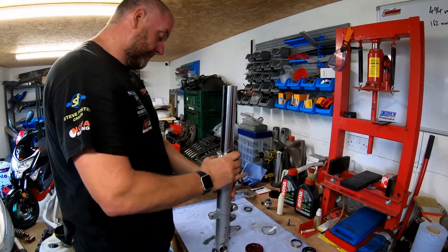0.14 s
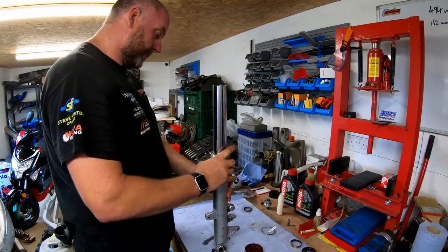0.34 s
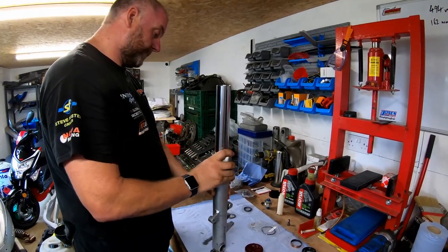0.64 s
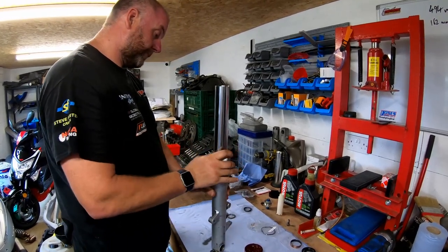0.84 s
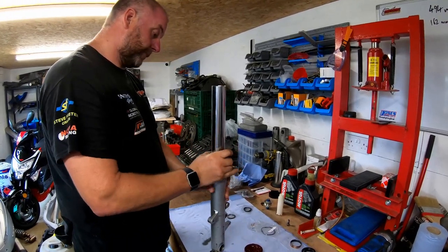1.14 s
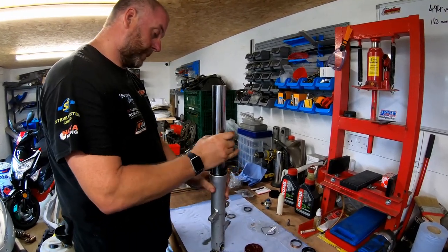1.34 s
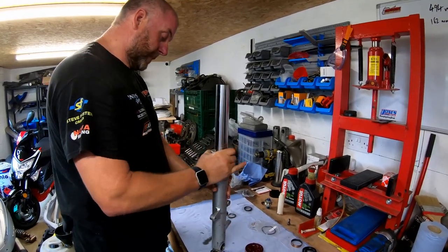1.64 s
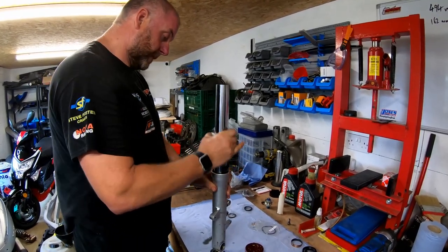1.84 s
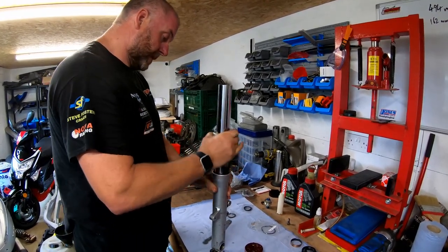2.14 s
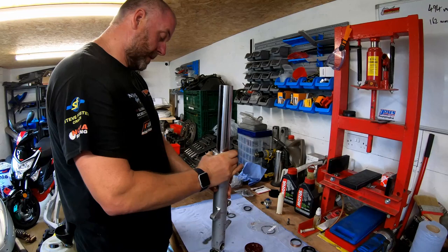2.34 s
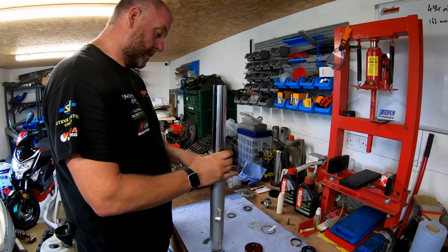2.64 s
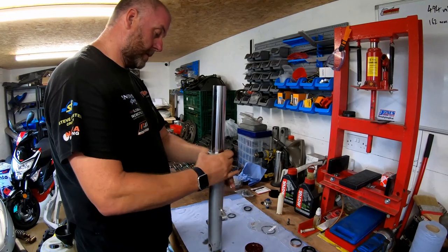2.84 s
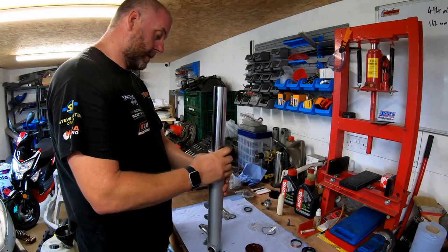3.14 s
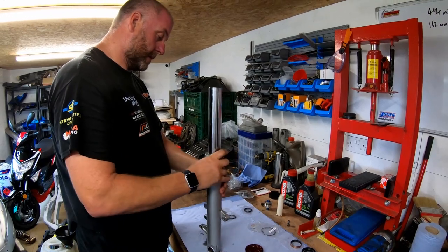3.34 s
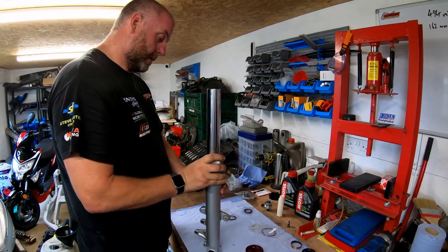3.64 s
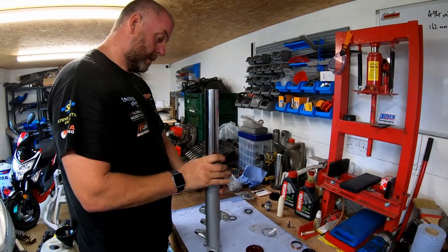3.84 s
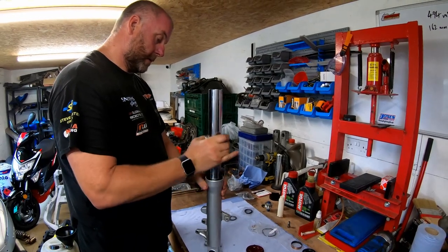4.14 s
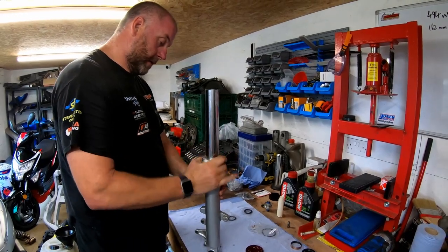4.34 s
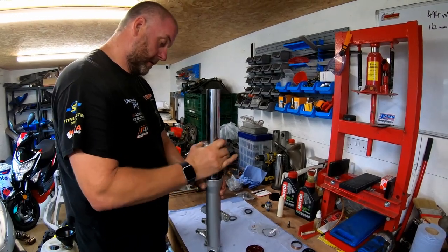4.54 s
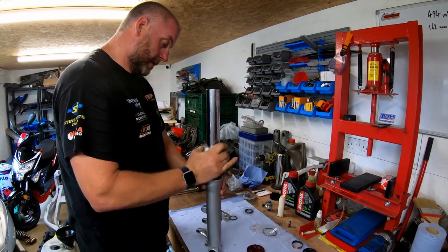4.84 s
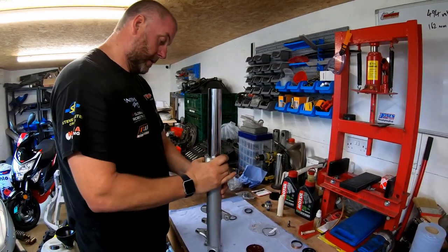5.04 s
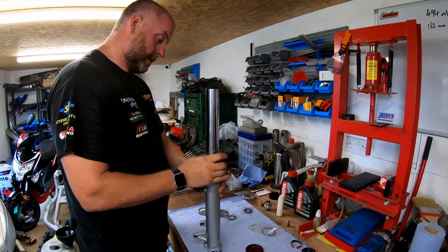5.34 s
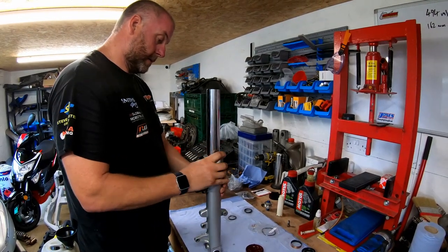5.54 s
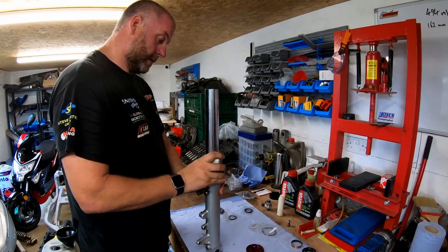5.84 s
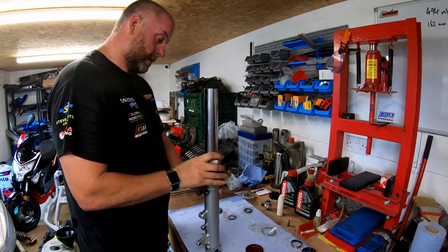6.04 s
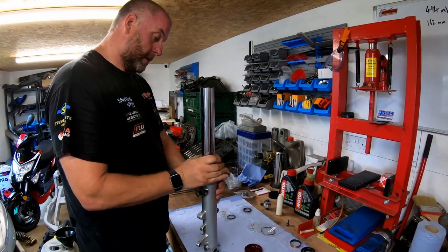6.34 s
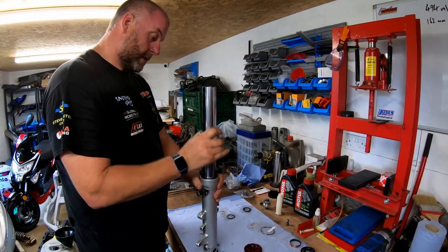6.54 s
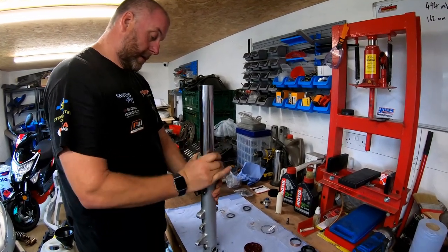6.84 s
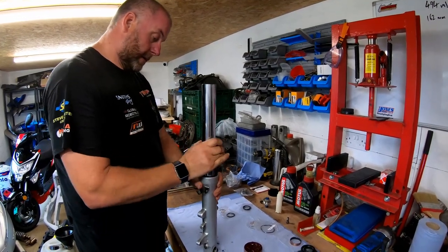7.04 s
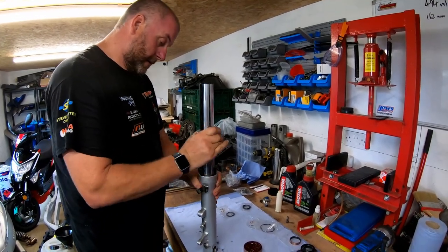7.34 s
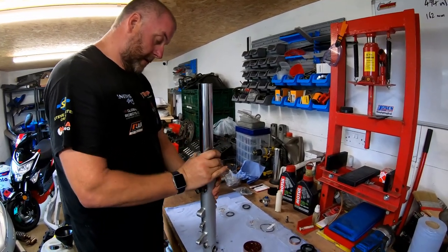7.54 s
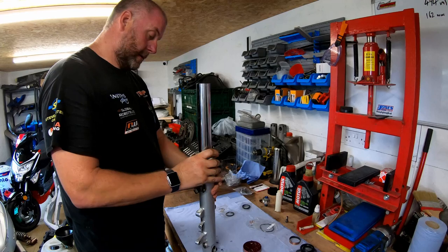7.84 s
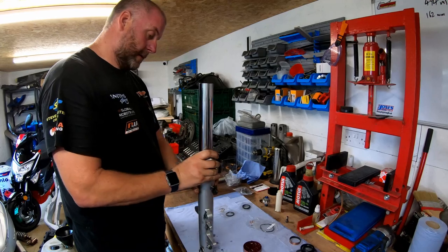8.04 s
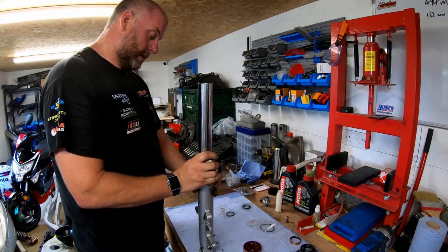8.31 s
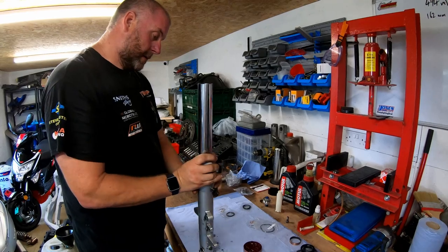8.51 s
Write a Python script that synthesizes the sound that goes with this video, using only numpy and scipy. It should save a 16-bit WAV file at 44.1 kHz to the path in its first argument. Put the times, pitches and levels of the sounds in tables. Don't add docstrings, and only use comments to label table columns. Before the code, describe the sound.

Close stereo in a small, quietly humming workshop. A steel driver slides along a fork tube and knocks a seal home: one hard knock, a pause with soft rubbing, three quick knocks, a light tap, three more, then two heavy blows. Each is a short metallic crack over a woody bench thump, with a thin ring of the tube soon choked by a hand. Loose driver halves clink between.

```python
import sys
import numpy as np
from scipy import signal
from scipy.fft import rfft, irfft
from scipy.io import wavfile

SR = 44100
rng = np.random.default_rng(int(sys.argv[2]) if len(sys.argv) > 2 else 0)


def gain_from_db(level_db):
    decades = np.asarray(level_db, float) / 20
    return 10 ** decades


def master(y):
    cut = np.clip(np.atleast_2d(y).T, -1, 1)
    pcm = np.round(cut * 32767)
    wavfile.write(sys.argv[1], SR, pcm.astype(np.int16))


N = 382655
RUN_IN = 4410
LONG = N + RUN_IN

# start_s, crack_db, bench_thump_db, slider_clack_db
KNOCKS = [
    (0.2416, -18, -11.5, -17),
    (1.811, -15, -10.5, -18),
    (2.119, -16.5, -11, -16.5),
    (2.4138, -16, -11.5, -17.5),
    (3.3712, -20, -16, -24),
    (4.5467, -13, -9, -16),
    (4.8337, -15, -11.5, -16.5),
    (5.117, -15.5, -11, -17),
    (7.0259, -13.5, -8, -17),
    (7.614, -15.5, -10, -15.5),
]
# start_s, crack_db, bench_thump_db, slider_clack_db
EARLIER = [(-.06, -12.5, -7.5, -14.5)]
# start_s, crack_db, bench_thump_db, collar_clack_db
LIFTS = [
    (0.1671, -51, -26.5, -31.5),
    (1.1609, -70, -60.5, -54.5),
    (1.7392, -59, -63.5, -53.5),
    (2.0323, -45.5, -27, -32.5),
    (2.3342, -46.5, -31, -31.5),
    (4.7630, -46, -23, -27.5),
    (5.061, -38.5, -24, -25.5),
    (7.528, -31, -19, -21),
]
# freq_hz, level_db (per Hz)
CRACK = [(880, -33.5), (1500, 0), (2260, 2.5), (2600, -7.5), (3120, -3.5), (4170, -9.5), (7970, -6.5),
         (10500, -20), (11500, -23.5), (14900, -51.5), (22000, -120)]


def at_hz(points, hz):
    table_hz, value = np.transpose(points)
    return np.interp(np.log(np.maximum(hz, 1)), np.log(table_hz), value)


def rms_one(x):
    return x / np.sqrt(np.mean(x ** 2) + 1e-20)


def colour(x, points):
    cepstrum = irfft(at_hz(points, np.fft.rfftfreq(4096, 1 / SR)) * np.log(10) / 20)
    cepstrum[1:2048] *= 2
    cepstrum[2049:] = 0
    taps = irfft(np.exp(rfft(cepstrum)))
    taps = taps.reshape((1,) * (x.ndim - 1) + (-1,))
    return signal.oaconvolve(x, taps, axes=-1)[..., :x.shape[-1]]


def low_pass(x, hz):
    return signal.lfilter(*signal.butter(2, hz, fs=SR), x)


def clicks(times, db):
    out = np.full(LONG, 1e-18)
    np.add.at(out, np.round(times * SR).astype(int) + RUN_IN, gain_from_db(db))
    return out


def struck(modes, times, db, scatter_db):
    out = 0
    luck = rng.standard_normal((len(times), len(modes)))
    for k, (hz, level_db, t60) in enumerate(modes):
        r = gain_from_db(-60 / (t60 * SR))
        w = 2 * np.pi * hz / SR
        blows = clicks(times, db + level_db + scatter_db * luck[:, k])
        out = out + (-1) ** k * signal.lfilter([0, np.sin(w)], [1, -2 * r * np.cos(w), r * r], blows)
    return out


def single_rings(rows):
    return sum(struck([(hz, db, t60)], np.array([s]), 0, scatter_db=1.0) for s, hz, db, t60 in rows)


def chatter(times, db, length_s, spectrum):
    t = np.arange(SR // 10) / SR
    shape = np.minimum(t / 0.00041, 1) * np.exp(-(t / length_s) ** 2)
    blows = clicks(times, db)
    noise = colour(rng.standard_normal(LONG), spectrum)
    burst = signal.oaconvolve(blows, shape)[:LONG] * rms_one(noise)
    return burst, colour(blows, spectrum) / noise.std()


def sung(noise, peaks):
    out = 0
    for hz, width_hz, db in peaks:
        r = np.exp(-np.pi * width_hz / SR)
        feedback = [1, -2 * r * np.cos(2 * np.pi * hz / SR), r * r]
        out = out + gain_from_db(db) * rms_one(signal.lfilter([1, 0, -1], feedback, noise))
    return out


def wide_noise(length):
    # freq_hz, correlation (0 to 1)
    likeness = [(60, 0.96), (170, 0.97), (350, 0.91), (520, 0.75), (1370, 0.27), (3890, 0.17),
                (11000, 0.023)]
    alike = np.clip(at_hz(likeness, np.fft.rfftfreq(length, 1 / SR)), -.99, .99)
    shares = np.sqrt([(1 + alike) / 2, (1 - alike) / 2])
    mid, side = rfft(rng.standard_normal((2, length))) * shares
    return irfft(np.array([mid + side, mid - side]), length)


def flicker(rate_hz, db):
    r = np.exp(-2 * np.pi * rate_hz / SR)
    wander = signal.lfilter([1], [1, -2 * r, r * r], rng.standard_normal(2 * N))[N:]
    return gain_from_db(db * rms_one(wander))


def strokes(rows):
    swing_db = 20
    out = np.zeros(N)
    for s, swell, fade, db in rows:
        i = np.arange(max(int((s - 2 * swell) * SR), 0), min(int((s + 2 * fade) * SR), N))
        t = i / SR - s
        out[i] += gain_from_db(db - swing_db * np.maximum(-t / swell, t / fade))
    return out


def background():
    # start_s, drone_db
    traffic = [(0, -49.5), (.7, -52.5), (.95, -52), (1.1, -72), (1.18, -41), (1.32, -55.5), (2.8, -53.5),
               (3.15, -55), (3.3, -65.5), (3.8, -67.5), (4.15, -59.5), (4.4, -78.5), (5.5, -50.5),
               (5.8, -58), (6.4, -48.5), (6.8, -56.5), (7.4, -51.5), (8.68, -63.5)]
    # start_s, deep_roll_db
    heavy = [(0, -71.5), (1.2, -53), (1.8, -55), (2.8, -70.5), (3.6, -70), (4.2, -57), (5.4, -75),
             (6.2, -81), (6.9, -54.5), (7.5, -56.5), (8.68, -83.5)]
    # freq_hz, width_hz, level_db
    drone_peaks = [(82.4, 2.9, 3), (104, 7.3, -27.5)]
    # freq_hz, width_hz, level_db
    hum = [(202.4, 5.3, -67), (356, 1.3, -76), (748, 160, -77.5)]
    # peak_s, swell_s, fade_s, level_db
    whine = [(3.0, .3, 0.28, -69.5)]
    # freq_hz, level_db (per Hz)
    air_spectrum = [(12, -44.5), (20, -10), (64, 1.5), (93, 2), (139, -11.5), (207, -10), (350, -21),
                    (499, -27), (743, -17), (2730, -27.5), (8130, -56.5), (11500, -61), (14900, -101),
                    (22000, -120)]
    t = np.arange(N) / SR
    drone, roll = [gain_from_db(np.interp(t, *np.transpose(rows))) for rows in (traffic, heavy)]
    noise = wide_noise(N)
    low = drone * sung(noise, drone_peaks)
    low = low + roll * sung(noise, [(54.5, 4.5, 1.3)])
    low = low + sung(noise, hum)
    low = low + strokes(whine) * sung(noise, [(956, 11, 0)])
    air = rms_one(colour(wide_noise(N), air_spectrum))
    return low + gain_from_db(-57.5) * flicker(3.6, db=0.5) * air


def bench_thump():
    # freq_hz, level_db, t60_s
    boom = [(57.7, -27, 0.79), (69.66, -16.5, 0.73), (80.97, -15.5, 0.58), (105, -14, 0.42),
            (114.6, -17.5, 0.49), (133.3, -10, 0.29), (142.2, -13.5, 0.41), (169.7, -13, 0.3),
            (197.01, -16.5, 0.38), (211.6, -13, 0.31), (234, -21, 0.12), (252.9, -27.5, 0.25),
            (296.8, -17, 0.35), (334, -20, 0.15), (391.3, -17, 0.15), (428.4, -19.5, 0.18)]
    # freq_hz, level_db, t60_s
    bench_top = [(92, -2, 0.044), (250, 1.5, 0.014), (430, -18, 0.027), (591, -17, 0.04), (707, -13, 0.03)]
    # delay_s after the knock, level_db
    bounces = [
        (.0008, 5),
        (.0050, -0.5),
        (.0092, -5),
    ]
    # start_s, frame_db, top_db
    bumps = [
        (1.169, -47, -52),
        (4.037, -42, -41.5),
        (6.357, -49.5, -41.5),
        (6.919, -33, -30.5),
        (8.13, -52, -40.5),
    ]
    s, _, thump_db, _ = np.transpose(EARLIER + KNOCKS + LIFTS)
    thump = struck(boom, s + 0.0065, thump_db + 4.5, scatter_db=2.4)
    thump += struck([(114.7, -1, 0.048)], s + .0075, thump_db, scatter_db=6.5)
    for wait_s, db in bounces:
        thump -= struck(bench_top, s + wait_s, thump_db + db + 4.5, scatter_db=1.6)
    bump_s, frame_db, top_db = np.transpose(bumps)
    thump += low_pass(struck(boom, bump_s, frame_db - 5.5, scatter_db=7.0), 130)
    thump += struck([(188, 0, 0.076), (240, -2, 0.026)], bump_s + .004, top_db, scatter_db=3.5)
    lift_s, _, lift_db, _ = np.transpose(LIFTS)
    thump += struck([(85, -1.5, 0.11)], lift_s + 0.0071, lift_db, scatter_db=13.5)
    push = low_pass(clicks(s, thump_db - 12.0), 600)
    return low_pass(thump, 650), push


def knocks():
    # freq_hz, level_db, t60_s
    body = [(1270, -3.5, 0.028), (2130, -7, 0.018), (2600, -7.5, 0.011), (2990, -6.5, 0.031),
            (4500, 0.5, 0.008), (6340, -8, .015), (8000, -7, 0.0062)]
    # freq_hz, level_db (per Hz)
    slider = [(260, -25), (420, 1), (540, -5), (720, -2.5), (1050, -7.5), (1290, -5.5), (1520, -11.5),
              (2000, -15.5), (2600, -18.5), (4000, -53), (8800, -100)]
    blow_s, blow_db, *_ = np.transpose(EARLIER + KNOCKS + LIFTS)
    crack, crack_click = chatter(blow_s, blow_db - 2.0, 0.0094, CRACK)
    s, crack_db, _, clack_db = np.transpose(EARLIER + KNOCKS)
    high = [mode for mode in body if mode[0] > 3000]
    low = [mode for mode in body if mode[0] < 3000]
    crack += struck(high, s + .001, crack_db - 8.5, scatter_db=8.0)
    crack += struck(low, s + .009, clack_db - 0.5, scatter_db=1.0)
    clack, clack_click = chatter(s, clack_db + 1.5, 0.022, slider)
    return crack + clack, crack_click + gain_from_db(3.0) * clack_click


def lifts():
    # freq_hz, level_db (per Hz)
    collar = [(260, -33.5), (450, -6.5), (643, -4), (757, -5.5), (1160, -6), (1330, -13.5), (1940, -8.5),
              (2390, -21), (3060, -21), (3610, -36), (6000, -30.5), (7800, -63), (13200, -120)]
    # freq_hz, level_db, t60_s
    collar_ring = [(640, -0.5, .08), (983, 1.5, 0.049), (1100, -1, 0.04), (1196, -1, .08),
                   (1954, -11.5, .07), (2060, -11.5, 0.08), (3050, -17.5, .05), (4600, -26.5, .03)]
    s, _, _, clack_db = np.transpose(LIFTS)
    rattle, click = chatter(s, clack_db + 4.5, 0.024, collar)
    rattle += struck(collar_ring, s, clack_db + 2.0, scatter_db=2)
    return rattle, gain_from_db(2.5) * click


def tube():
    # start_s, freq_hz, level_db, t60_s, gripped_s
    rings = [(-.06, 6700, -53, 0.94, .2), (-.06, 2718, -54.5, 1.0, .2), (0.241, 2710, -51, 1.2, .9),
             (.411, 2718, -72, 0.72, .95), (2.415, 2718, -52.5, 0.77, 3.3), (3.374, 2724, -58, 2.9, 4.15),
             (4.548, 2746, -51.5, 1.52, 4.85), (4.833, 2740, -50, 1.6, 5.3), (5.117, 2730, -55, 0.96, 5.6),
             (7.025, 2731, -48, 1.3, 7.38), (7.026, 3590, -61, 1.6, 7.4), (7.529, 2780, -42.5, 0.315, 9.9),
             (7.615, 2718, -45, 2.05, 8.25), (7.615, 3640, -62.5, 1.3, 8.1), (7.615, 6640, -65, 1.2, 8.0)]
    t = (np.arange(LONG) - RUN_IN) / SR
    return sum(single_rings([row[:4]]) * gain_from_db(-70 * np.maximum(t - row[4], 0)) for row in rings)


def workshop(x):
    # freq_hz, t60_s
    room_t60 = [(100, 0.77), (350, 0.39), (1000, 0.38), (2500, 0.39), (6400, 0.37), (11000, 0.34)]
    # freq_hz, level_db
    room_level = [(100, -15.5), (400, 3), (1200, 5), (3000, 2), (6000, 1.5), (8500, 2), (11000, 1.5)]
    t = np.arange(SR) / SR
    noise = wide_noise(SR)
    echo = 0
    edges = 60 * 2 ** np.arange(0, 8.1, .5)
    for low, high in zip(edges, edges[1:]):
        band = signal.sosfilt(signal.butter(2, [low, high], "band", fs=SR, output="sos"), noise)
        hz = np.sqrt(low * high)
        echo = echo + band * gain_from_db(at_hz(room_level, hz) - 60 * t / at_hz(room_t60, hz))
    build_up = np.clip((t - .003) / 0.0064, 0, 1)
    return signal.oaconvolve(x[None], echo * build_up, axes=-1)[:, :LONG]


def rubbing():
    # peak_s, swell_s, fade_s, skin_hiss_db, singing_steel_db
    along_tube = np.array([(.82, 0.055, 0.2, -77, -77), (1.27, 0.067, 0.088, -77, -75),
                           (1.5, 0.33, 0.2, -70.5, -67.5), (1.7, 0.18, 0.15, -80, -74),
                           (3.0, .3, 0.27, -88.5, -79.5), (3.27, 0.22, 0.058, -84, -69),
                           (3.8, 0.24, 0.066, -73.5, -76.5), (3.87, .06, 0.056, -72, -78),
                           (4.17, 0.027, 0.11, -86, -76.5), (4.335, 0.12, 0.13, -64, -59.5),
                           (5.94, 0.019, .03, -85, -84), (6.065, 0.112, 0.12, -65, -73),
                           (6.38, 0.26, 0.179, -90.5, -69.5), (6.6, 0.088, .2, -78.5, -60.5),
                           (6.78, 0.22, 0.13, -63.5, -52.5), (7.3, 0.2, 0.26, -84, -65),
                           (7.47, .1, 0.21, -76, -76), (7.525, 0.013, .005, -57.5, -60),
                           (8.2, 0.071, 0.13, -63.5, -66.5), (8.55, 0.154, 0.16, -84.5, -71.5),
                           (8.67, .2, .1, -81.5, -62)])
    # peak_s, swell_s, fade_s, level_db
    scuffs = [(.69, 0.18, 0.33, -72), (1.18, 0.4, 0.16, -59.5), (1.66, 0.24, 0.3, -62.5),
              (2.96, 0.43, 0.4, -65), (3.32, 0.17, 0.11, -77), (4.05, 0.34, 0.18, -61),
              (4.33, 0.405, 0.33, -55.5), (5.59, 0.08, 0.103, -59.5), (6.39, 0.18, 0.112, -55.5),
              (6.53, 0.086, 0.78, -57.5), (6.88, 0.094, 0.13, -56.5), (7.25, .2, 0.22, -58.5),
              (8.14, 0.046, 0.28, -61.5), (8.62, 0.412, 0.28, -59)]
    # freq_hz, level_db (per Hz)
    skin_spectrum = [(880, -28.5), (1500, 1.5), (3830, -3.5), (5200, -8.5), (6170, -6), (11500, -14),
                     (14900, -49.5), (22000, -120)]
    # freq_hz, width_hz, level_db
    steel_peaks = [(1700, 150, -5), (2400, 600, -5), (3400, 170, 0), (4400, 100, -5), (5900, 300, -12),
                   (8200, 150, -11)]
    # freq_hz, width_hz, level_db
    sleeve_peaks = [(240, 180, 0), (380, 290, -5.5), (834, 400, 0), (1270, 230, -9)]
    # freq_hz, width_hz, level_db
    lean_peaks = [(190, 110, 1), (328, 140, -6.5)]
    # high hiss, singing bands, low bands [dB]
    rush_db = [-39.5, -43.5, -19.5]
    rush_s = [0.06, .07, 0.02]
    skin, steel, lean = [strokes([(s - .003, swell, .004, crack_db + db) for s, crack_db, *_ in KNOCKS])
                         for db, swell in zip(rush_db, rush_s)]
    skin = skin + strokes(along_tube[:, [0, 1, 2, 3]])
    steel = steel + strokes(along_tube[:, [0, 1, 2, 4]])
    noise = wide_noise(N)
    hiss = gain_from_db(7.5) * rms_one(colour(noise, skin_spectrum)) * skin
    song = gain_from_db(-1.5) * rms_one(sung(noise[:, ::-1], steel_peaks)) * steel
    scuff = gain_from_db(-2.5) * rms_one(sung(noise, sleeve_peaks)) * strokes(scuffs)
    return flicker(60, db=1.5) * (hiss + song + scuff) + lean * sung(noise, lean_peaks)


def touched(modes, s, db, ratio, luck):
    t = np.arange(SR // 4) / SR
    hz, level_db, t60 = np.transpose(modes)[:, :, None]
    hz = hz * np.clip(ratio, .96, 1.04) * (1 + .005 * luck[0][:, None])
    decay = gain_from_db(db + level_db + 2 * luck[1][:, None] - 60 * t / t60)
    ring = np.sum(decay * np.sin(2 * np.pi * hz * t), axis=0)
    out = np.zeros(LONG + SR)
    i = int(s * SR) + RUN_IN
    out[i:i + len(t)] = ring * (1 - np.exp(-(t / .0007) ** 2))
    return out[:LONG]


def clinks():
    # start_s, low_group_db, high_group_db, high_group_pitch_ratio (as the grip seats it
    touches = [(0.4109, -39, -46.5, 1.0), (1.1590, -42, -73, 0.76), (1.169, -51.5, -57.5, 1.005),
               (1.218, -54, -66.5, 1.0), (1.243, -58, -71, 1.0), (1.737, -54, -67, 1.0),
               (3.334, -40, -52.5, 1.0), (4.435, -28, -39.5, 1.032), (4.4482, -34, -42, 1.015),
               (4.459, -41, -55, .99), (4.484, -43, -47.5, 1.025), (5.061, -22.5, -40, 0.92),
               (5.4083, -47.5, -52, .99), (5.6155, -39, -43.5, .965), (5.626, -48, -46, 1.1),
               (6.9098, -14, -22.5, 1.012), (6.918, -26.5, -19.5, 1.014), (6.944, -34.5, -32, 1.02),
               (6.962, -43, -39, 1.1), (6.988, -40, -40, 1.02), (7.5287, -21, -39, .975),
               (7.543, -24.5, -38, 1.1), (7.556, -20.5, -46, .97)]
    # freq_hz, level_db, t60_s
    halves_low = [(1260, -20.5, 0.023), (1810, -6.5, 0.037), (1910, -1, 0.068), (2006, 0, 0.045),
                  (2160, -6, 0.04), (2753, -13.5, 0.04), (3100, -10.5, 0.035), (3430, -11.5, 0.03),
                  (3850, -8, 0.044)]
    # freq_hz, level_db, t60_s
    halves_high = [(4380, -12, .03), (5140, -14.5, 0.034), (5320, -14, 0.056), (5560, -9, 0.061),
                   (5580, -5, 0.095), (5797, -2.5, 0.067), (5780, -6.5, .05), (5900, -13.5, 0.045),
                   (6670, -22, 0.04)]
    rebound_s, rebound_db = 0.0033, -5.5
    start_s, all_low_db, *_ = np.transpose(touches)
    broad_tick = sum(chatter(start_s, all_low_db - 18, 0.02, CRACK))
    luck = rng.standard_normal((len(touches), 2, 2, len(halves_low)))
    rings = 0
    for (s, low_db, high_db, ratio), (low_luck, high_luck) in zip(touches, luck):
        rings = rings + touched(halves_low, s, low_db, 1, low_luck)
        rings = rings + touched(halves_high, s, high_db + 4, ratio, high_luck)
    return broad_tick + rings + gain_from_db(rebound_db) * np.roll(rings, int(rebound_s * SR))


def ticks():
    # start_s, freq_hz, level_db, t60_s
    contacts = [(1.161, 2900, -44, 0.09), (1.161, 3600, -60, 0.028), (1.177, 660, -44.5, 0.06),
                (.862, 3800, -59, 0.025), (6.5, 1800, -51.5, 0.037), (5.617, 3300, -51.5, 0.05),
                (5.617, 4680, -51, .06), (6.1, 2720, -51.5, 0.091), (5.618, 1260, -53.5, .06),
                (4.436, 1700, -42, .04), (6.912, 3350, -30.5, .04), (6.912, 3000, -28, .07),
                (5.62, 2000, -52, 0.053), (5.63, 1400, -50, 0.046), (1.159, 1800, -45, 0.116),
                (6.915, 5000, -30, .03), (7.53, 1700, -34.5, .04), (1.6, 2700, -45.5, 0.053),
                (3.334, 2880, -45.5, 0.03), (3.334, 1200, -49, 0.034), (4.167, 2500, -53, 0.018),
                (4.233, 1630, -38.5, 0.021), (2.1, 2100, -47.5, 0.043), (8.184, 2520, -48, 0.12),
                (8.19, 2900, -53, 0.11), (8.185, 1540, -60, 0.04), (8.184, 2000, -58.5, .04),
                (8.547, 3900, -56, 0.025)]
    return single_rings(contacts)


def scene():
    # freq_hz, level_db
    steel_shadow = [(250, -7.5), (400, 1), (650, -9.5), (1500, -15), (3000, -1), (8000, -4.5), (11000, 6.5)]
    # freq_hz, level_db
    bench_shadow = [(250, -0.55), (420, 1), (600, -6)]
    thump, push = bench_thump()
    knock, knock_click = knocks()
    lift, lift_click = lifts()
    steel = knock + lift
    click = knock_click + lift_click + push
    buzz = np.resize(flicker(170, db=3.5), LONG)
    clink = gain_from_db(-4.0) * buzz * clinks()
    tick = buzz * ticks()
    left = colour(steel, steel_shadow) + gain_from_db(-3.5) * clink + colour(thump, bench_shadow)
    right = steel + clink + thump
    direct = np.array([left, right]) + tube() + tick
    wet = workshop(gain_from_db(-4.5) * click + gain_from_db(-31) * clink + gain_from_db(-34.0) * thump + .02 * tick)
    wet = wet * np.resize(flicker(30, db=1.0), LONG)
    return (direct + wet)[:, RUN_IN:] + rubbing() + background()


def top_cut(x):
    return signal.sosfilt(signal.butter(12, 11640, fs=SR, output="sos"), x)


def record(dry):
    x = signal.sosfilt(signal.butter(2, 62, "high", fs=SR, output="sos"), dry)
    x = signal.sosfilt(signal.cheby2(10, 45, 12100, fs=SR, output="sos"), x)
    mix = 1.287 * np.tanh(x / 1.293)
    return top_cut(mix)


dry = scene()
out = record(dry)
master(out)
```